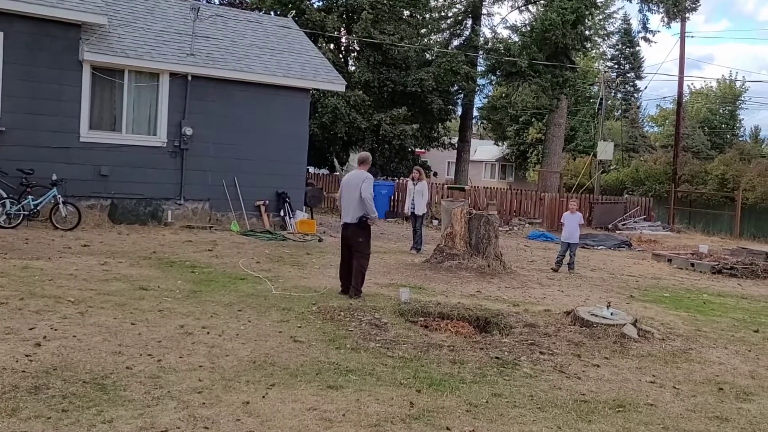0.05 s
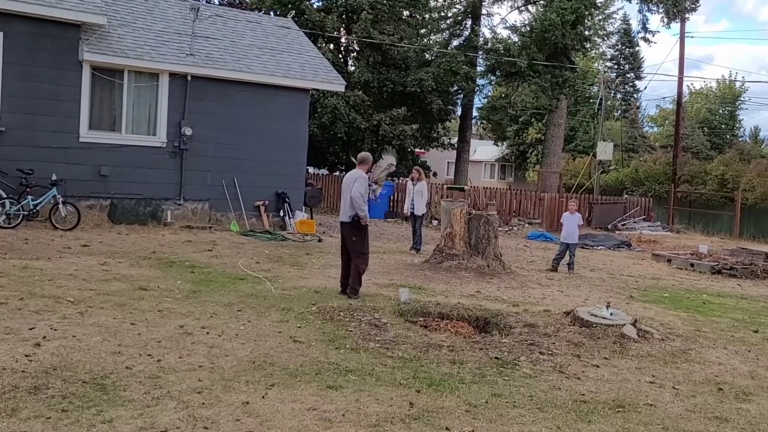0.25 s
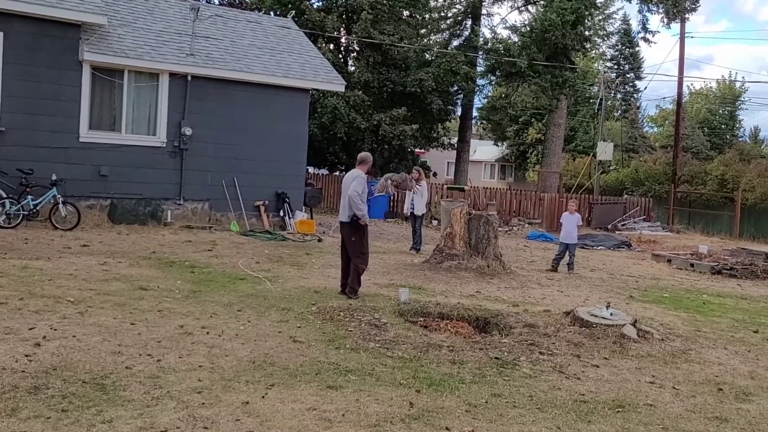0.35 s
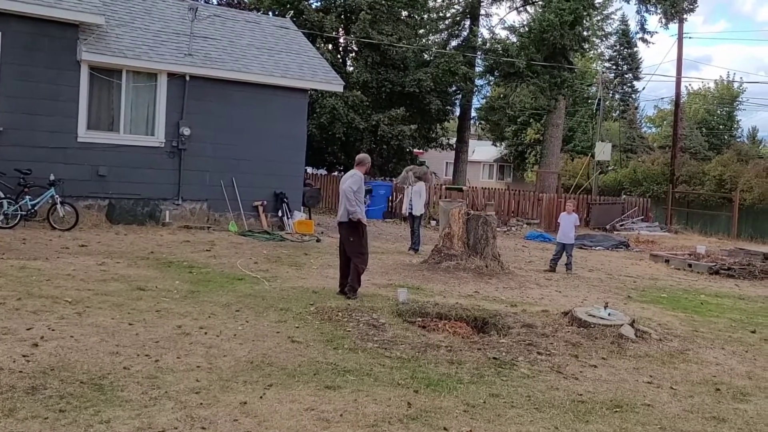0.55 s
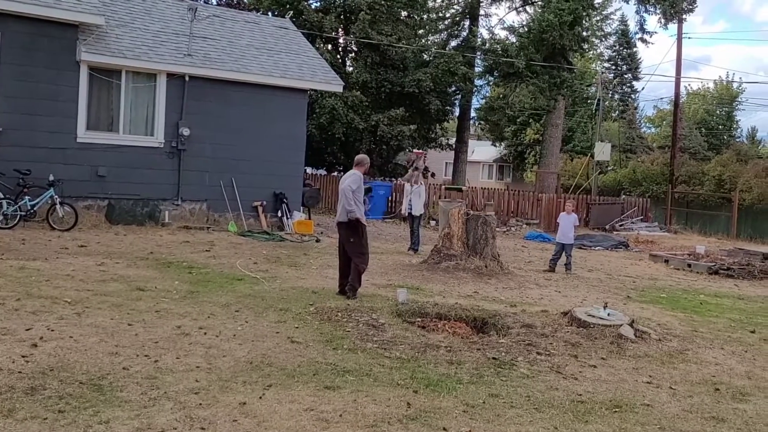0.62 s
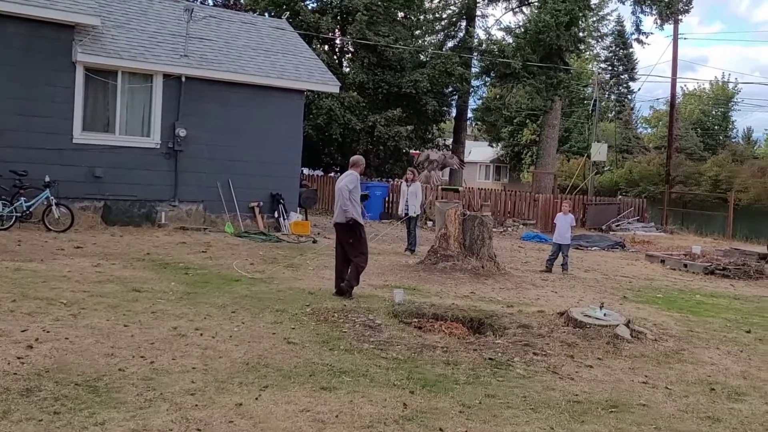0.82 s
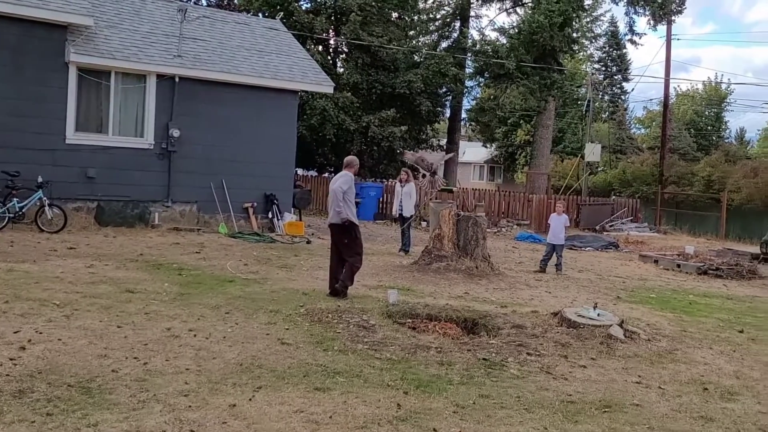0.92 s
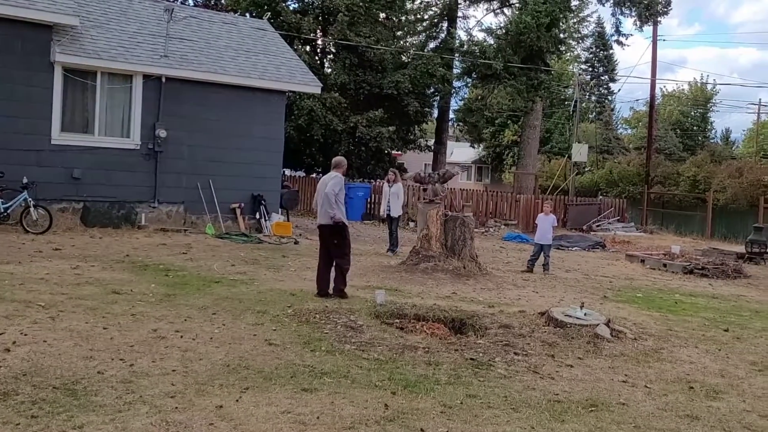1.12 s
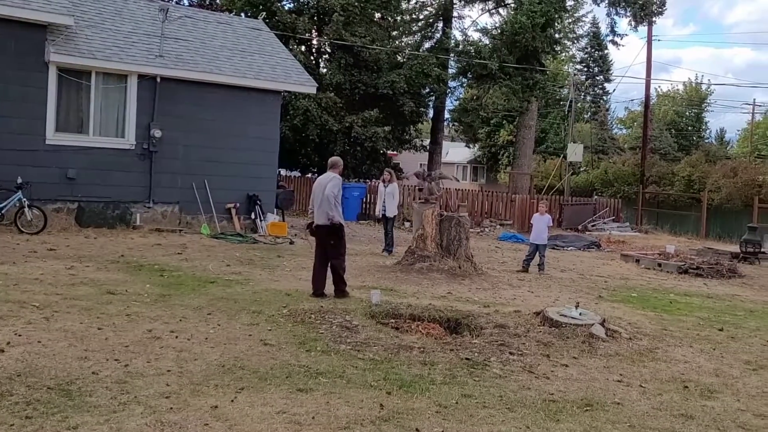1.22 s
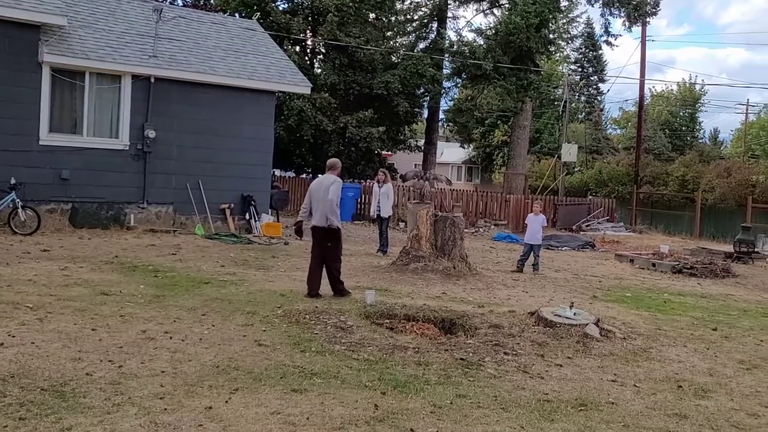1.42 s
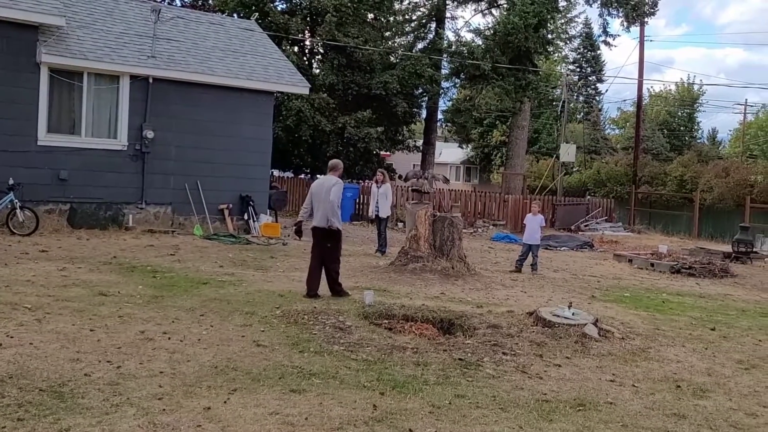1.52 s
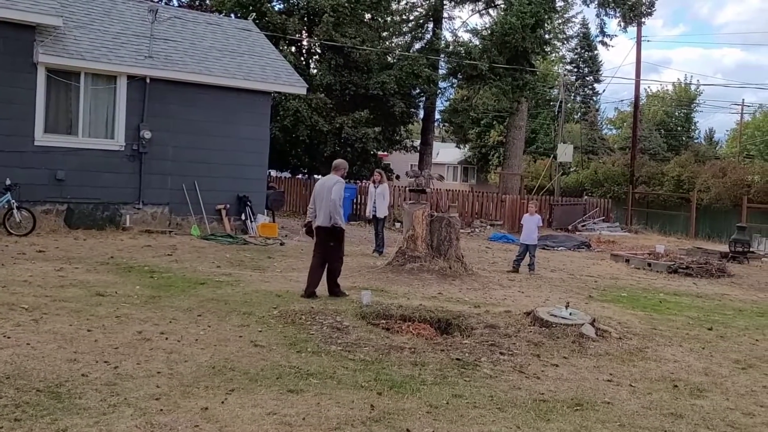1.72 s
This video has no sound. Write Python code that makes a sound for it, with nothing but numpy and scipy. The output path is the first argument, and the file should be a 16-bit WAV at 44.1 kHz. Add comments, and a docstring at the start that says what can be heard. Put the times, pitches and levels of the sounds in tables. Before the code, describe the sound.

A small jingle bell is shaken in bursts outdoors, with one hollow wooden knock midway

```python
"""A backyard, where a small slotted jingle bell is shaken left of centre. Its loose pellet knocks the shell:
the slot rings as short swelling sine tones over a filtered rattle, the thin shell as faint high resonances.
Gritty noise bursts tick, scrape and rustle, decaying sines make a hollow wooden knock with wall echoes and
soft thuds, and grains with hiss make a dry rustle. Shaped noise gives distant traffic rumble and a wavering hum."""
import sys
import numpy as np
from scipy import signal
from scipy.fft import rfft, irfft
from scipy.io import wavfile
from scipy.ndimage import uniform_filter1d

SR = 44100
rng = np.random.default_rng(int(sys.argv[2]) if len(sys.argv) > 2 else 0)


def digitize_waveform(pressure):
    """Quantize a signal to 16-bit integers and store it at the path in sys.argv[1].

    Rows of a 2-D input are taken as channels; values are limited to [-1, 1].
    """
    field = np.atleast_2d(pressure).T
    bounded = np.clip(field, -1, 1)
    quanta = np.round(bounded * 32767).astype(np.int16)
    wavfile.write(sys.argv[1], SR, quanta)


def ratio_of_db(decibels):
    """Turn decibels (scalar or array-like) into linear amplitude factors; 0 dB maps to 1."""
    return 10 ** (np.asarray(decibels, float) / 20)


N = 77175
T = np.arange(N) / SR  # seconds


def evened(x):
    """Scales a sound to an rms of 1."""
    return x / np.sqrt(np.mean(x ** 2) + 1e-20)


def read(points, hz):
    """Reads a curve of (Hz, value) points, interpolated over log frequency."""
    f, value = np.transpose(points)
    return np.interp(np.log(hz + 1), np.log(f + 1), value)


def colour(x, points):
    """Filters the last axis by a spectrum in dB."""
    size = x.shape[-1]
    gain = ratio_of_db(read(points, np.fft.rfftfreq(size, 1 / SR)))
    return irfft(rfft(x) * gain, size)


def add(mix, s, sound, pan_db):
    """Mixes in a sound at s seconds; pan_db is left over right."""
    part = mix[:, round(s * SR):][:, :sound.shape[-1]]
    sides = ratio_of_db(np.array([[pan_db], [-pan_db]]) / 2)
    part += (sound * sides)[:, :part.shape[1]]


def resonate(x, hz, width):
    """Shifts the curve hz down to zero, smooths, and shifts back: a resonance of gain 1."""
    turn = np.exp(2j * np.pi * np.cumsum(hz * np.ones(N)) / SR)
    r = np.exp(-np.pi * width / SR)
    smooth = signal.lfilter([1 - r], [1, -r], x / turn)
    return 2 * (turn * smooth).real


def clicks(per_s, spread_db):
    """Sparse random clicks, a few of them large."""
    size = ratio_of_db(spread_db * np.minimum(rng.exponential(1, N), 4))
    sign = rng.choice([-1., 1.], N)
    return size * sign * (rng.random(N) < per_s / SR)


def yard(x):
    """Sparse reflections of random sign, each band dying at its own speed."""
    # Each row: frequency in Hz, decay time by 60 dB in seconds.
    decay = [(300, 0.078), (1300, 0.61), (3000, 0.95), (8000, 0.35)]
    taps = np.zeros((2, 30000))
    at = np.arange(200, 29900, 22) + rng.integers(0, 22, (2, 1350))
    np.put_along_axis(taps, at, rng.choice([-1., 1.], at.shape), 1)
    hz, t, z = signal.stft(taps, SR, nperseg=256)
    fade = ratio_of_db(-60 * t / read(decay, hz)[:, None])
    tail = signal.istft(z * fade, SR, nperseg=256)[1]
    tail /= np.linalg.norm(tail[0])
    return signal.fftconvolve(x.mean(0)[None], tail, axes=1)[:, :N]


SLOT_HZ = 2849.2  # before the bend of the swing


def slot_strikes(bend):
    """Each pellet strike ticks and swells a slot tone, choked after its own length; also returns the power."""
    # Pellet strikes. Each row: start in seconds, level in dB, ring in seconds before it is choked.
    strikes = [(0.181, -45, 0.0064), (0.2053, -35, 0.013), (0.223, -31.5, 0.012), (0.2566, -28, 0.022),
               (0.2743, -27, 0.013), (0.2926, -27.5, 0.019), (0.3113, -29.5, 0.023), (0.3342, -32, 0.0068),
               (0.3605, -27.5, 0.006), (0.381, -28.5, 0.0078), (0.391, -25.5, 0.0051),
               (0.4088, -25.5, 0.0048), (0.42, -18, 0.016), (0.429, -25.5, 0.0035), (0.4483, -24.5, 0.014),
               (0.4564, -24, 0.016), (0.479, -23.5, 0.012), (0.493, -32.5, 0.016), (0.5079, -29, 0.027),
               (0.546, -37.5, 0.0068), (0.584, -23.5, 0.012), (0.5915, -20.5, 0.0089), (0.6021, -23, 0.012),
               (0.6209, -27.5, 0.03), (0.6602, -24, 0.012), (0.687, -28, 0.017), (0.701, -25.5, 0.008),
               (0.7159, -26.5, 0.0051), (0.7326, -37, 0.028), (0.7621, -29, 0.0075),
               (0.7713, -24.5, 0.0058), (0.782, -29, 0.036), (0.7982, -31, 0.044), (0.833, -24, 0.0025),
               (0.8738, -35, 0.007), (0.92, -33, 0.029), (0.951, -28, 0.017), (0.9771, -32, 0.029),
               (0.9982, -29.5, 0.021), (1.013, -27, 0.022), (1.0428, -31.5, 0.02), (1.1006, -31, 0.011),
               (1.11, -35, 0.066), (1.126, -25, 0.011), (1.151, -29, 0.018), (1.172, -31, 0.026),
               (1.196, -31, 0.01), (1.2285, -28.5, 0.012), (1.247, -20, 0.019), (1.2729, -35.5, 0.011),
               (1.3, -37.5, 0.023), (1.329, -30.5, 0.014), (1.3481, -23.5, 0.013), (1.374, -34, 0.0084),
               (1.4237, -27, 0.012), (1.451, -37, 0.018), (1.495, -33, 0.0059), (1.5258, -38, 0.0061),
               (1.5496, -47.5, 0.0052), (1.5638, -35, 0.0056), (1.632, -35, 0.0045), (1.6553, -41.5, 0.013)]
    pan_db, pan_scatter_db = 5.5, 3.0  # the tumbling slot beams more to one side or the other
    rise_s, t60_s, choke_s = 0.003, 0.12, 0.002
    pitch_scatter = 0.015  # share of pitch that varies with the pellet's place
    tick_db, tick_s, tick_hz = -17, 0.0014, 3350
    twist_turns = 0.045  # scatter of phase, opposite on the two sides
    out, power, t = np.zeros((2, N)), np.zeros((2, N)), np.arange(2500) / SR
    scatter = rng.standard_normal((len(strikes), 4))
    for (s, db, length), (detune, turn, phase, twist) in zip(strikes, scatter):
        swell = np.sin(np.pi / 2 * np.minimum(t / rise_s, 1)) ** 2
        choke = 1 + np.exp(np.minimum((t - length) / choke_s, 50))
        shape = swell * ratio_of_db(db - 60 * t / t60_s) / choke
        hz = SLOT_HZ * bend[round(s * SR)] * (1 + pitch_scatter * detune)
        side_phase = twist_turns * twist * np.array([[1], [-1]])
        ring = shape * np.sin(2 * np.pi * (hz * t + phase + side_phase))
        tick_shape = ratio_of_db(db + tick_db) * t / tick_s * np.exp(-t / tick_s)
        tick = tick_shape * np.sin(2 * np.pi * (tick_hz * t + turn))
        add(out, s, ring + tick, pan_db + pan_scatter_db * turn)
        add(power, s, shape ** 2, 2 * pan_db)
    return out, power


def slot_rattle(power, bend):
    """Small random clicks ring the slot, 13.5 dB quieter than the smoothed strikes around them."""
    linger = signal.windows.hann(round(0.063 * SR))  # smoothing window of 63 ms
    effort = np.sqrt(abs(signal.fftconvolve(power, linger[None] / linger.sum(), "same")))
    sides = []
    for side in range(2):
        rattle = resonate(clicks(800, 2.5), SLOT_HZ * bend, 220)
        # two broad resonances in a row trim what lies far from the slot's pitch
        rattle = resonate(resonate(rattle, SLOT_HZ, 830), SLOT_HZ, 730)
        sides.append(evened(rattle))
    return ratio_of_db(-13.5) * effort * np.array(sides)


def shell(bend, swing_db):
    """The thin shell shimmers: clicks excite high modes whose pitch and level follow the swing."""
    # Shell modes. Each row: frequency in Hz, level in dB, decay time by 60 dB in seconds,
    # steepness in dB per dB with which it follows the swing around middle_db.
    modes = [(5960, -1, 0.11, 0.56), (6143, -1.5, 0.084, 0.65), (10000, 1, 0.052, 0.9056),
             (10900, -4.5, .07, 1.06), (13200, -15, 0.0027, 0.97), (15700, -8.5, 0.054, 0.76)]
    middle_db = -76
    out = np.zeros((2, N))
    for hz, mode_db, t60, follow in modes:
        level = ratio_of_db(middle_db + mode_db + follow * (swing_db - middle_db))
        width = np.log(1000) / np.pi / t60
        for side in range(2):
            taps = resonate(clicks(400, 7.0), hz * bend, 900)
            out[side] += level * evened(resonate(taps, hz * bend, width))
    return out


def bell():
    """One pitch bend, as the bell swings to and fro, moves slot and shell together; the yard answers."""
    # Swing of the bell. Each row: time in seconds, pitch of the third shell mode in Hz, shell level in dB.
    swing = [(0.21, 10100, -100), (0.27, 10020, -68.5), (0.329, 10120, -84), (0.448, 9948, -60),
             (0.539, 10180, -86.5), (.61, 9986, -71), (.79, 9870, -68), (.885, 10000, -95),
             (1.019, 9850, -66.5), (1.089, 10030, -72.5), (1.201, 10000, -74), (1.31, 10030, -70),
             (1.58, 9996, -100.5)]
    s, hz, db = np.transpose(swing)
    bend = np.interp(T, s, hz) / 10000  # over the third mode's unbent pitch
    swing_db = np.interp(T, s, db, -150, -150)
    out, power = slot_strikes(bend)
    out += slot_rattle(power, bend)
    out += shell(bend, swing_db)
    out[0] = np.roll(out[0], round(0.00042 * SR))  # the left side lags by 0.42 ms
    return out + ratio_of_db(-11) * yard(out)


def scrape():
    """Bursts of gritty noise under smooth windows: ticks, scrapes and a longer closing rustle, with a yard tail."""
    # Gritty bursts, the last a longer rustle.
    # Each row: start in seconds, length in seconds, level in dB, left over right in dB.
    bursts = [(.053, 0.0029, -65.5, -11), (.195, 0.0078, -61, 11.5), (.088, 0.0024, -52.5, -6.5),
              (0.09, 0.016, -48.5, -13), (0.157, 0.01, -53.5, 4), (1.67, 0.27, -63, 8)]
    # Grit spectrum. Each row: frequency in Hz, gain in dB.
    spectrum = [(1100, -9), (1500, -7), (2200, 3), (3400, 1), (5500, -26.5), (7200, -16.5), (10000, -52)]
    out = np.zeros((2, N))
    grit = evened(colour(clicks(9000, 7.4), spectrum))
    for s, length, db, pan_db in bursts:
        start = round(s * SR)
        window = signal.windows.tukey(round(length * SR), 0.5)[:N - start - 1]
        add(out, s, ratio_of_db(db) * window * grit[start:][:len(window)], pan_db)
    return out + ratio_of_db(-15.0) * yard(out)


def knock():
    """A blow on hollow wood, a brief noise crack over its decaying modes, heard again from each wall."""
    # Knock and its echoes. Each row: start in seconds, body peak in dB before panning,
    # crack drive in dB relative to the body, before its filter.
    blows = [(1.1599, -16, -5), (1.1869, -29, -11.5), (1.2019, -37.5, 13), (1.2314, -40, -1.5),
             (1.291, -41.5, 2), (1.318, -48, 1.5)]
    # Wood modes. Each row: frequency in Hz, relative level in dB, decay time by 60 dB in seconds.
    wood = [(1048, -11.5, 0.026), (1305, -0.5, 0.026), (1772, -10, 0.014), (3270, 0, 0.013)]
    # Crack spectrum. Each row: frequency in Hz, gain in dB.
    crack_spectrum = [(1500, -20), (3300, 0), (5500, -7), (15600, -17)]
    crack_s = 0.0011
    out, t = np.zeros((2, N)), np.arange(3000) / SR
    body = sum(ratio_of_db(db - 60 * t / t60) * np.sin(2 * np.pi * hz * t) for hz, db, t60 in wood)
    body *= np.minimum(t / 0.0015, 1)
    body /= abs(body).max()
    for s, db, crack_db in blows:
        crack_shape = ratio_of_db(crack_db) * t / crack_s * np.exp(-t / crack_s)
        crack = crack_shape * rng.standard_normal((2, len(t)))
        add(out, s, ratio_of_db(db) * (body + colour(crack, crack_spectrum)), 1.5)
    out[0] = np.roll(out[0], round(0.0001 * SR))  # the left side lags by about 0.1 ms
    return out + ratio_of_db(-11.5) * yard(out)


def thuds():
    """Low damped pushes: sines with a soft 6.4 ms onset that die away."""
    # Soft thuds. Each row: start in seconds, level in dB, frequency in Hz, decay time by 60 dB in seconds.
    pushes = [(0.362, -49, 187.5, 0.13), (.372, -40.5, 760, 0.033), (0.408, -39, 192.6, 0.062),
              (1.164, -37, 117.7, 0.1)]
    out, t = np.zeros((2, N)), np.arange(6000) / SR
    for s, db, hz, t60 in pushes:
        shape = ratio_of_db(db - 60 * t / t60) * np.minimum(t / 0.0064, 1)
        add(out, s, shape * np.sin(2 * np.pi * hz * t), 0)
    return out


def rustle():
    """Cloth or grass: dry grains and hiss under one level curve."""
    # Rustle level. Each row: time in seconds, level in dB.
    levels = [(.13, -101), (.17, -70.5), (.25, -71.5), (.35, -88.5), (.385, -67.5), (.455, -77.5),
              (.56, -78), (.59, -59.5), (.66, -72), (.80, -74.5), (.88, -92), (1.155, -84.5), (1.165, -65),
              (1.21, -70), (1.35, -76.5), (1.58, -92), (1.64, -78.5)]
    # Rustle spectrum. Each row: frequency in Hz, gain in dB.
    spectrum = [(900, -25), (1800, -7), (3300, 0), (5000, -9), (7300, -10), (9000, -22), (12500, -19),
                (15600, -23)]
    hiss_share = 0.4
    grains = np.array([evened(clicks(1500, 4.0)) for side in range(2)])
    hiss = rng.standard_normal((2, N))
    mix = colour((1 - hiss_share) * grains + hiss_share * hiss, spectrum)
    return evened(mix) * ratio_of_db(np.interp(T, *np.transpose(levels)))


def background():
    """Distant traffic: noise rumble with drifting patches, near mono in the bass, and a wavering hum."""
    # Rumble spectrum. Each row: frequency in Hz, relative density in dB per Hz.
    spectrum = [(45, -19), (75, 2.5), (110, -1.5), (180, -12.5), (350, -11.5), (800, -13), (1500, -18),
                (2200, -32), (3500, -39.5), (5500, -64.5), (15600, -59)]
    # Stereo width. Each row: frequency in Hz, left-right likeness (1 is mono, negative is out of phase).
    likeness = [(130, 0.92), (290, 0.83), (640, -0.055), (1400, -0.41), (3000, 0.96)]
    frames, hz = N // 256 + 5, np.fft.rfftfreq(1024, 1 / SR)
    a, b, c, d, patches = rng.standard_normal((frames, 513, 5)).T
    patches = uniform_filter1d(patches, size=8, axis=0)  # over frequency
    patches = evened(uniform_filter1d(patches, size=12, axis=1))  # over time
    same = np.clip(read(likeness, hz), -1, 1)[:, None]
    left = a + 1j * b
    right = same * left + np.sqrt(1 - same ** 2) * (c + 1j * d)
    z = np.array([left, right]) * ratio_of_db(read(spectrum, hz)[:, None] + 2.5 * patches)
    rumble = evened(signal.istft(z, nperseg=1024, noverlap=768)[1][:, :N])
    # noise through a resonance 1.7 Hz wide wavers like a hum
    hum = evened(resonate(rng.standard_normal(N), 118.7, 1.7))
    return ratio_of_db(-57) * rumble + ratio_of_db(-69) * hum


def scene():
    """Sums the bell, the noises around it and the background."""
    return bell() + scrape() + knock() + thuds() + rustle() + background()


def low_pass(x):
    """Removes everything above the highest recorded frequency."""
    return signal.sosfilt(signal.butter(12, 15710, fs=SR, output="sos"), x)


def record(dry):
    """Finishes the mix for output."""
    return low_pass(dry)


dry = scene()
out = record(dry)
digitize_waveform(out)
```